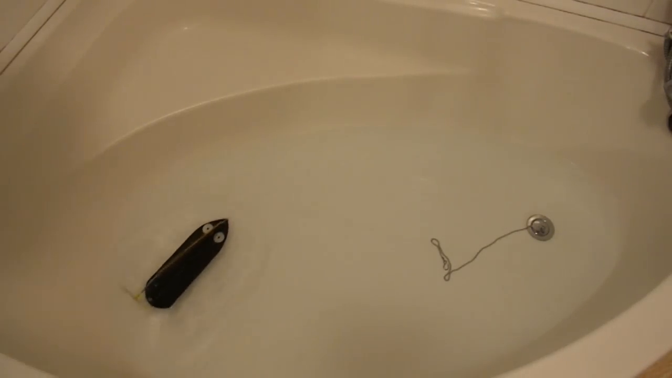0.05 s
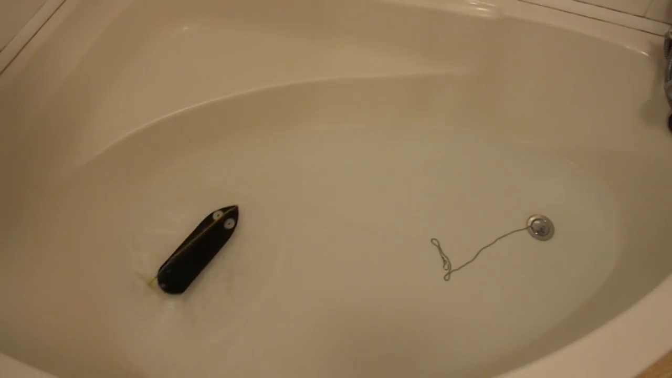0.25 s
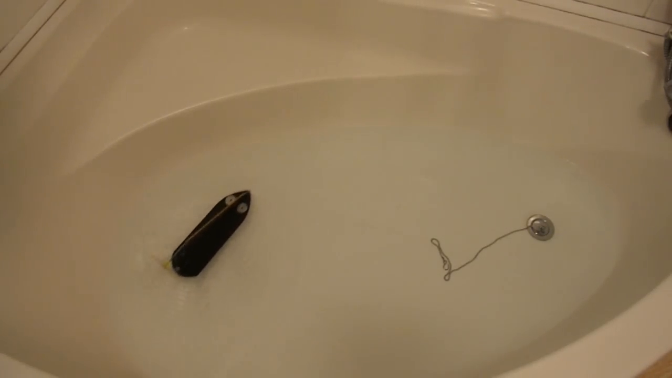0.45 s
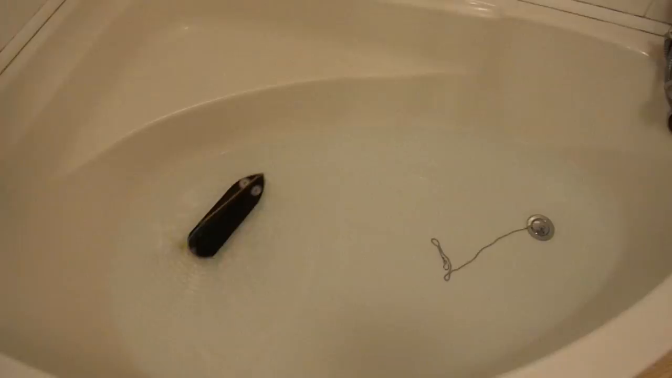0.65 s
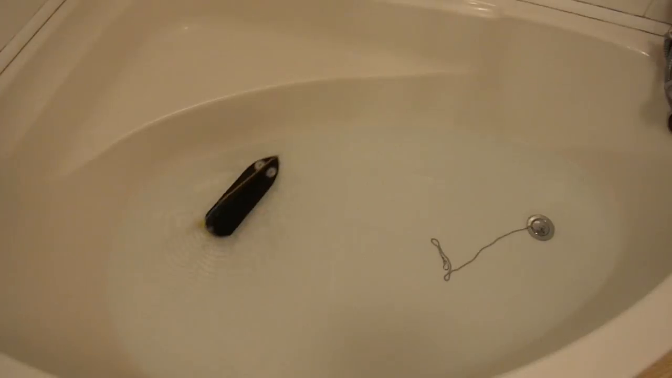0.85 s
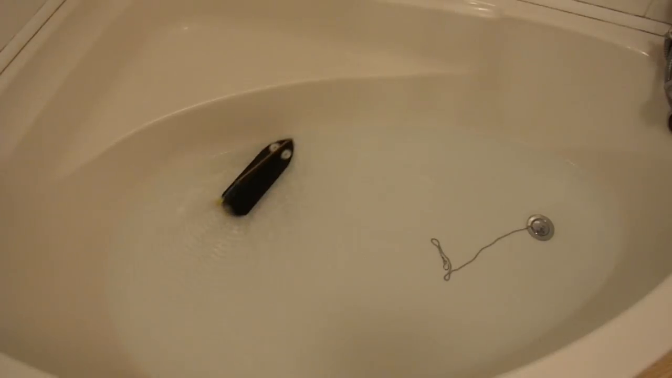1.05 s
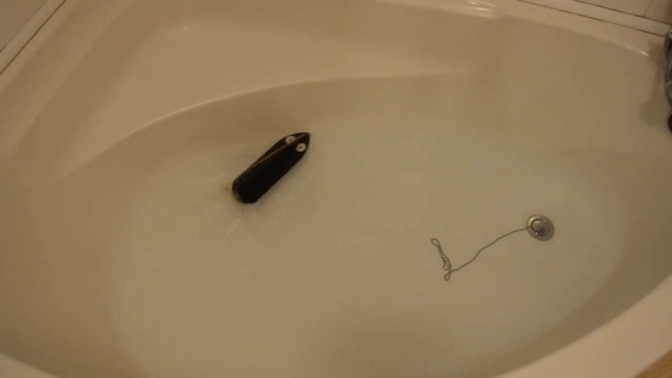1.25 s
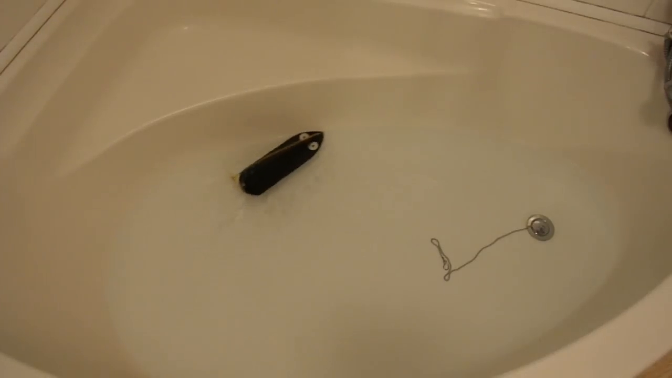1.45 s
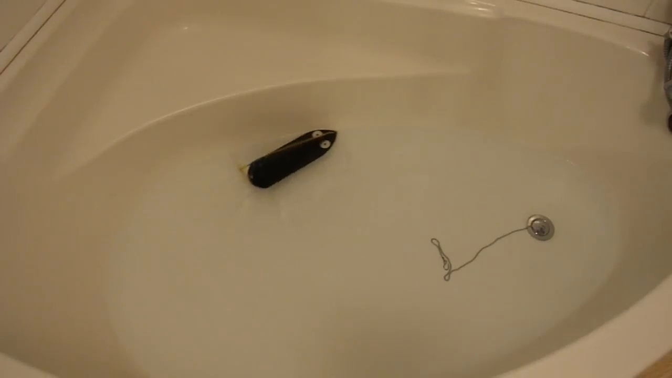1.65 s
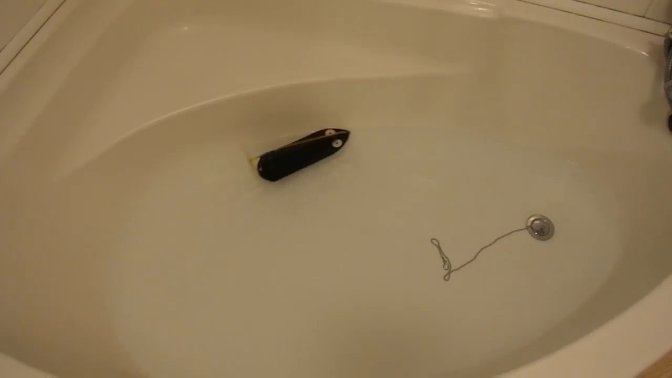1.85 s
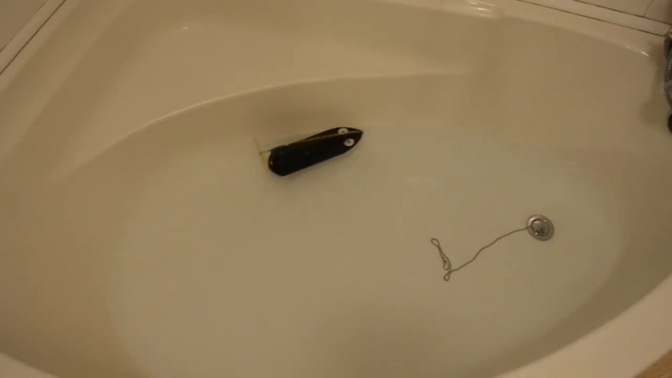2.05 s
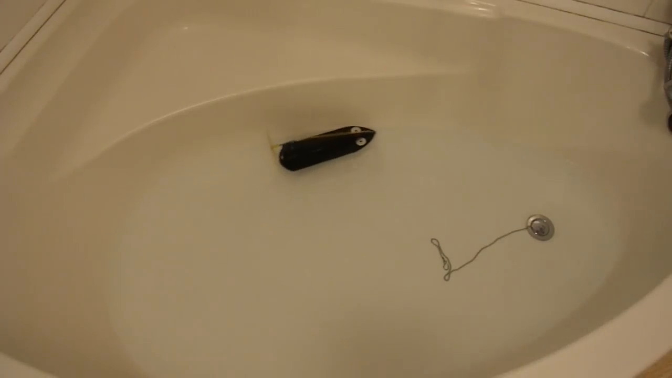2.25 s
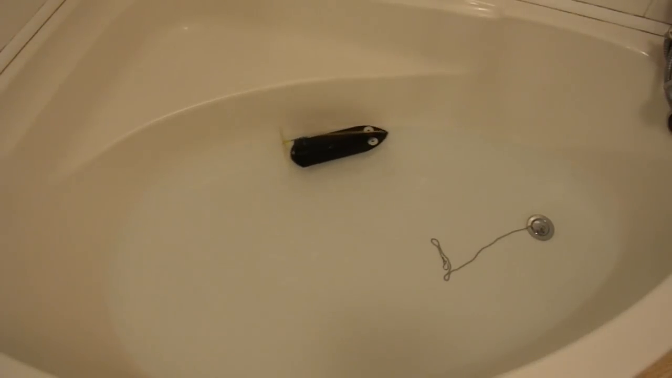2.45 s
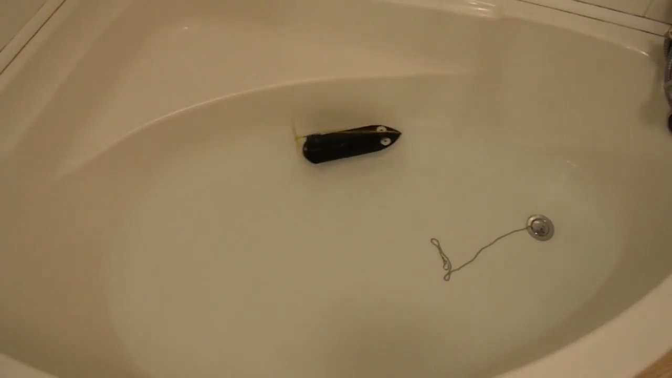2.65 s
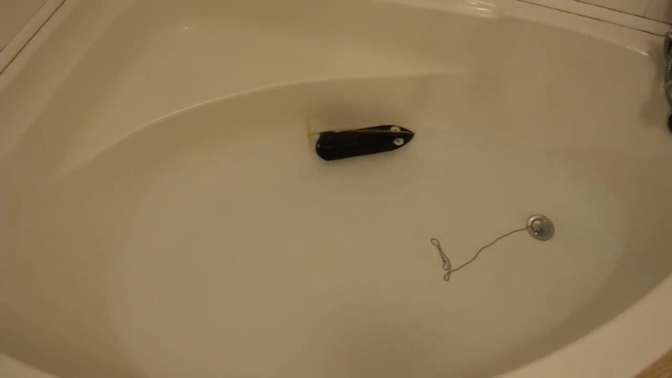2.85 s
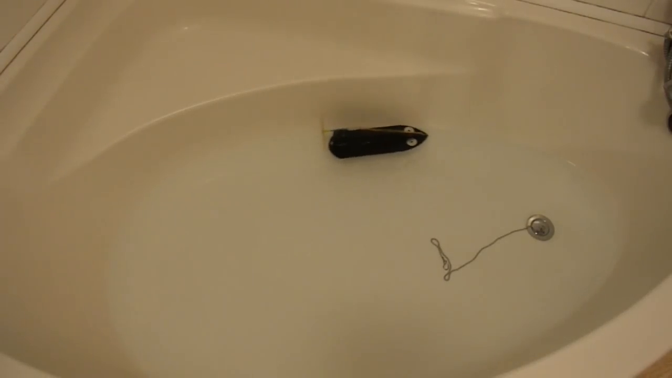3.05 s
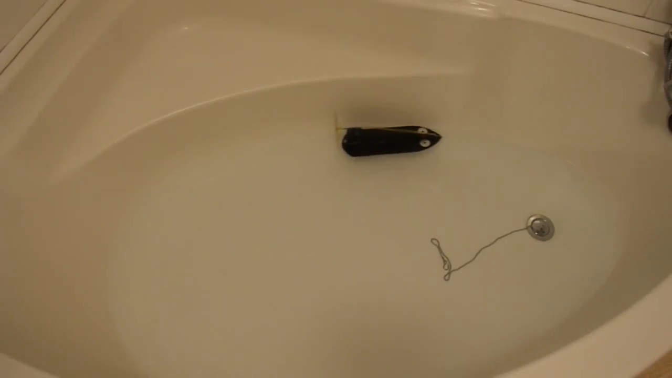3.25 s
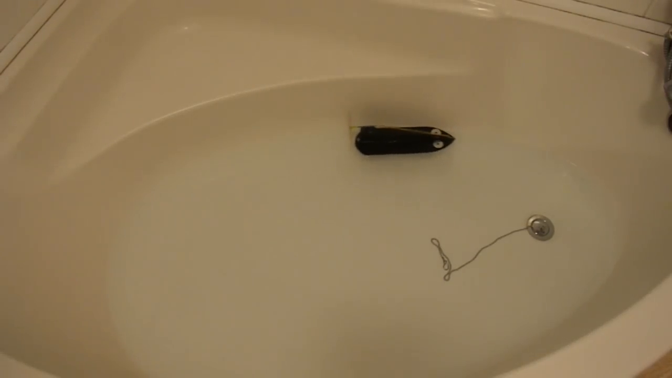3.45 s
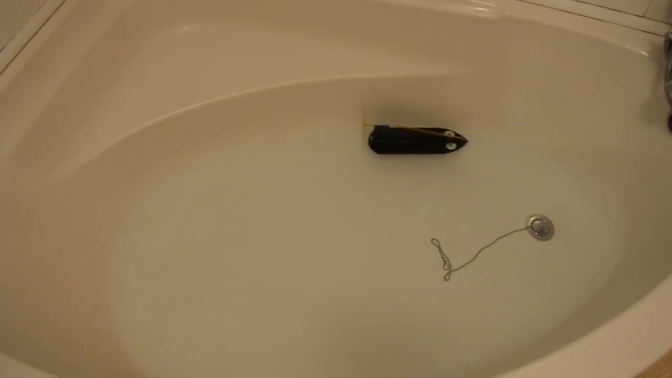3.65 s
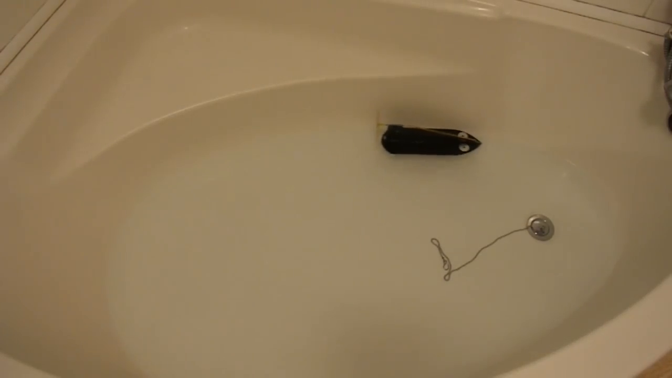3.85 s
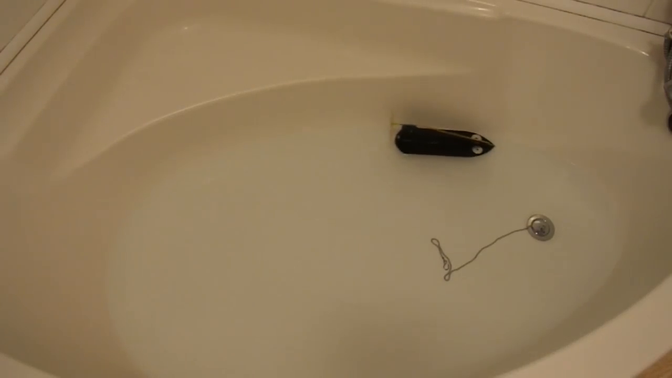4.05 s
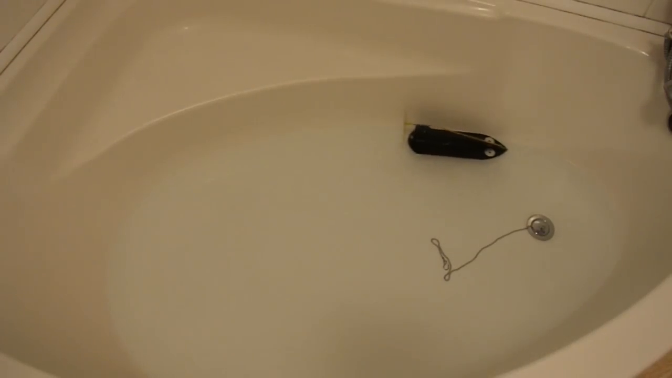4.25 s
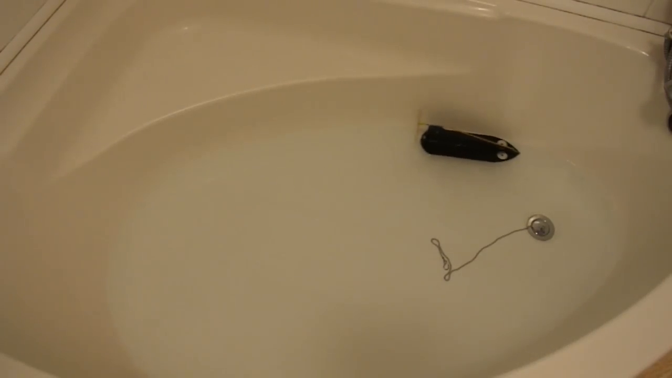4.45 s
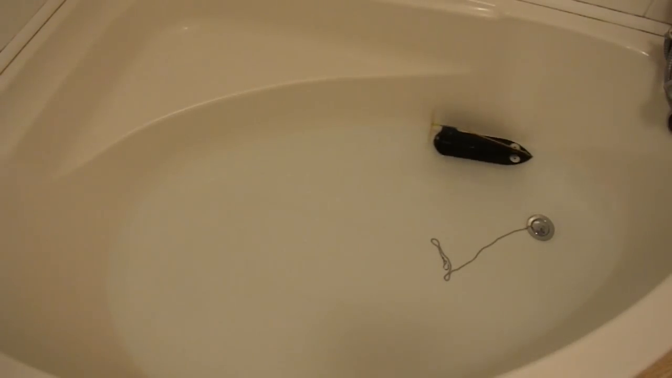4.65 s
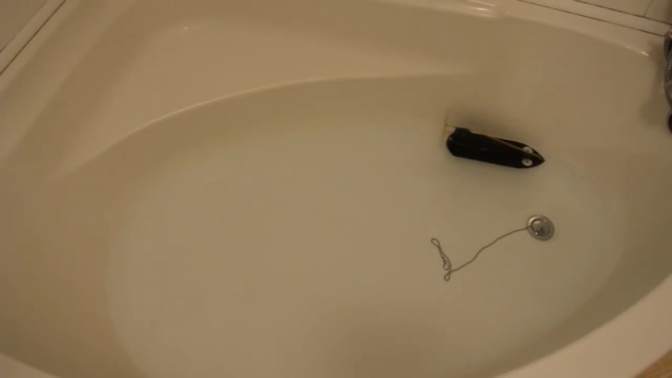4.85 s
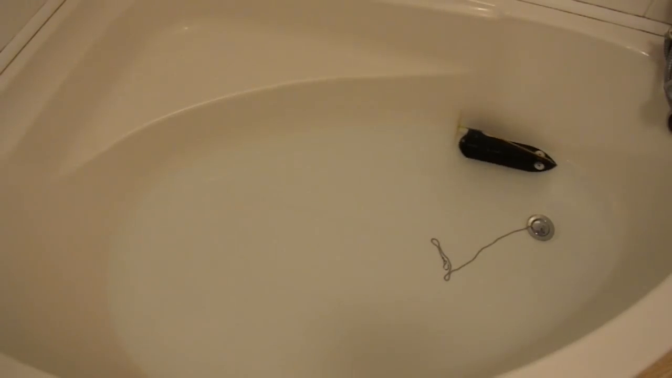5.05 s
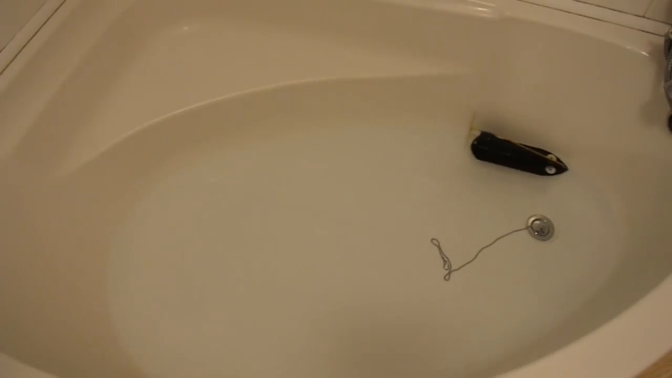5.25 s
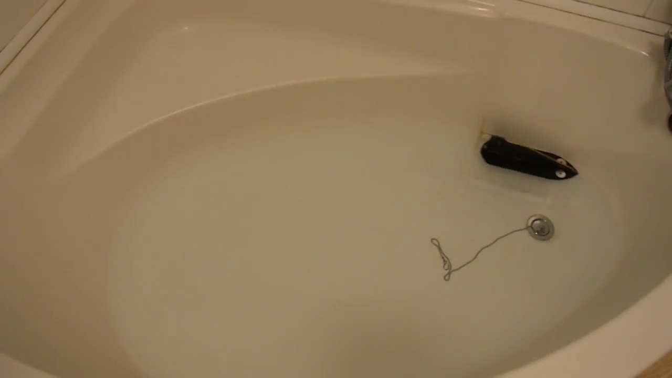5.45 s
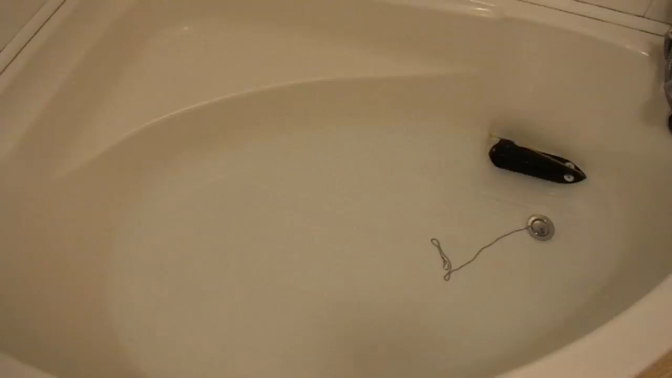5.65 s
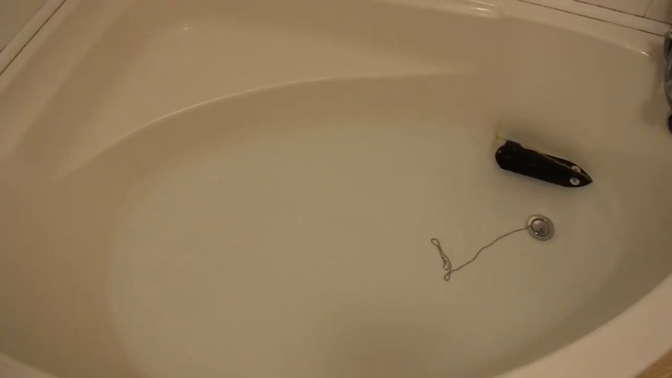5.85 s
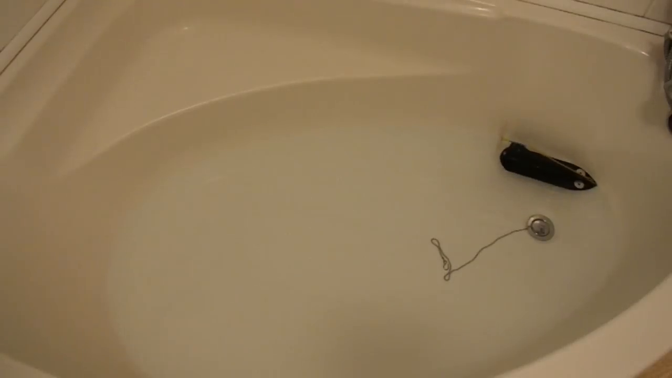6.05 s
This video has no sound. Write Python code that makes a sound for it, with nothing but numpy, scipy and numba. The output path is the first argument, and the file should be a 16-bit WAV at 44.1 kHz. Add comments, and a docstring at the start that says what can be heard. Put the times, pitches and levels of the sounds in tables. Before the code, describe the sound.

Close stereo pickup of a small propeller beating water in a filled bath. Wet, crackling splashes come about thirty times a second, with hollow plastic rapping and bubbling notes. The first second and a half is strongest, then it weakens into sparse patters. A bright hard clack with a short tub echo lands near the end, followed by quiet dribbling.

```python
"""In a hard tiled bathroom a toy boat crosses a filled bath, heard close by two microphone ports side by side.
Its rubber-driven propeller churns ever more weakly: random droplets and noise bursts make spray and splashes.
The churn drums on resonances of tub and hull, bubbles gurgle as rising tones, and the walls echo as noise.
One sharp knock, late on, is a cluster of short rings with flutter and a tub tail; gain control ducks after it.
Low hums, hiss, a thin whine and deep rumble lie beneath."""
import sys
import numpy as np
from scipy import signal
from scipy.fft import rfft, irfft
from scipy.io import wavfile
from scipy.ndimage import uniform_filter1d
from numba import njit

SR = 44100
rng = np.random.default_rng(int(sys.argv[2]) if len(sys.argv) > 2 else 0)


def transcribe(u):
    """Save the signal u as a 16-bit wav file named by the first command-line argument.

    u: samples, shape (n,) or (channels, n), limited to [-1, 1]; the rate is SR.
    q: integer samples, one column per channel.
    """
    v = np.clip(np.atleast_2d(u).T, -1, 1)
    q = np.round(v * 32767).astype(np.int16)
    wavfile.write(sys.argv[1], SR, q)


N = 269010  # length [samples]


def undb(db):
    """Amplitude factor of a level in dB."""
    return 10 ** (np.asarray(db) / 20)


def level(x, db):
    """Scale to an rms level in dB."""
    return x * undb(db) / np.sqrt(np.mean(x ** 2))


def butter(x, order, hz, kind="low"):
    """Butterworth filter with its edge or edges in Hz."""
    return signal.sosfilt(signal.butter(order, hz, kind, fs=SR, output="sos"), x)


def colour(x, table):
    """Causal filter with the given (frequency [Hz], gain [dB]) shape, from the folded cepstrum."""
    hz, db = np.transpose(table)
    size = 8192
    bins_hz = np.arange(1, size // 2 + 2) * SR / size
    log_gain = np.interp(np.log(bins_hz), np.log(hz), db) * np.log(10) / 20
    cepstrum = irfft(log_gain)
    cepstrum[1:size // 2] *= 2
    cepstrum[size // 2 + 1:] = 0
    impulse = irfft(np.exp(rfft(cepstrum)))
    return signal.fftconvolve(x, impulse)[:len(x)]


def band(x, hz, width_hz):
    """One resonance, gain 1 at the centre."""
    return signal.lfilter(*signal.iirpeak(hz, hz / width_hz, fs=SR), x)


def walk(rate):
    """Random levels held 1 / rate s and slewed twice; spread near 1."""
    k = int(SR / rate)
    held = np.repeat(rng.standard_normal(N // k + 1), k)
    return 1.55 * uniform_filter1d(uniform_filter1d(held, k), k)[:N]


def add(out, s, x):
    """Mix x into out from s seconds on."""
    i = round(s * SR)
    out[i:i + len(x)] += x[:len(out) - i]


def hiss():
    """Steady background hiss: coloured noise."""
    # hiss spectrum: (frequency [Hz], density [dB per Hz])
    hiss_shape = [(30, -14), (200, -17), (600, 7), (3000, 5.5), (8000, -12), (15000, -30)]
    return level(colour(rng.standard_normal(N), hiss_shape), -55.5)


def whine(t):
    """A thin steady whine: one sine."""
    whine_hz, rms_db = 9778, -62.5
    return np.sqrt(2) * undb(rms_db) * np.sin(2 * np.pi * whine_hz * t)


def low_hums(t):
    """Narrow wavering notes under the churn: noise through two sharp resonances, faded in and out."""
    # faint hums: (centre time [s], frequency [Hz], level before the fades [dB], half length [s])
    hum_events = [(.7, 178, -69, 0.54), (1.15, 207, -62, .2), (2.2, 148.7, -63.5, 0.76),
                  (3.6, 246.3, -75.5, 1.8)]
    out = 0
    for s, hz, db, half in hum_events:
        note = band(band(rng.standard_normal(N), hz, 9.3), hz, 9.3)
        out = out + level(note, db) * np.exp(-((t - s) / half) ** 4)
    return out


def echo(gap_s=0.0014, rise_s=0.00086):
    """Dense echo of the tiled walls from one spot: octave bands of noise that die at their own pace."""
    # decay time of the room: (frequency [Hz], time to fall 60 dB [s])
    room_decay = [(200, 0.74), (700, 0.26), (2000, 0.73), (6000, 0.011), (14000, 0.6)]
    t = np.arange(SR // 2) / SR
    hz, t60 = np.transpose(room_decay)
    tail = 0
    for f in 180 * 2. ** np.arange(7):
        decay = undb(-60 * t / np.interp(f, hz, t60))
        tail = tail + band(rng.standard_normal(len(t)), f, 0.56 * f) * decay
    tail = tail * np.clip((t - gap_s) / rise_s, 0, 1)
    return tail / np.sqrt(np.sum(tail ** 2))


def room(x, count=16, size=SR // 2):
    """The boat travels, so each stretch of its way has its own echo; the stretches fade into each other."""
    step = N // count
    x = np.pad(x, 2 * step, mode="reflect")  # the propeller was already running
    out = np.zeros(len(x) + SR)
    fade = np.sin(np.pi * np.arange(2 * step) / (2 * step))
    for i in range(0, len(x) - 2 * step, step):
        stretch = x[i:i + 2 * step] * fade
        add(out, i / SR, signal.fftconvolve(stretch, echo()[:size]))
    return out[2 * step:2 * step + N]


def knock():
    """A few quick contacts, each a short swelling ring with grit; the tub wall spreads the blow into the room."""
    # contacts: (time [s], relative level [dB], ring [Hz], build-up [s])
    contacts = [(5.2736, -14, 2400, .0004), (5.2740, -12, 3400, .0003), (5.2736, -13, 950, .0008),
                (5.2749, -8, 6400, .0004), (5.2755, 0, 6500, .0006), (5.2753, -9, 2400, .0009),
                (5.2755, -20, 10500, .0006)]
    # what the tub wall radiates into the room: (frequency [Hz], density [dB per Hz])
    wall_shape = [(71, -76), (120, -20), (250, -30), (498, -11), (575, -10), (676, -14), (900, -5),
                  (1690, -14.5), (2160, -9.5), (4130, -9.5), (7450, -4), (13400, -33), (15500, -70)]
    # ring of the struck tub: (frequency [Hz], relative level [dB], time to fall 60 dB [s])
    tub_body = [(227, -12, 0.47), (303, -10, 0.48), (389, -12.5, .35), (494, 0, 0.32), (528, -4, 0.29),
                (698, 5, 0.27), (857, -7, 0.28), (890, -0.5, 0.26), (928, -4, 0.37), (1070, -14, 0.32),
                (1206, -3, .3), (1950, 0, 0.3), (1980, -13, 0.16), (2500, 0, 0.22)]
    start_s = contacts[0][0]
    out, t = np.zeros(N), np.arange(SR // 100) / SR
    for (s, db, hz, rise), grit in zip(contacts, rng.standard_normal((len(contacts), len(t)))):
        shape = (t / rise) ** 2 * np.exp(1 - (t / rise) ** 2)
        add(out, s, undb(db) * shape * (np.sin(2 * np.pi * hz * t) + 0.2 * grit))
    out = butter(out, 2, [600, 11000], "band")

    # the blow bounces between the tub walls, duller than the blow itself and weaker each time
    bounce_s = 0.0047
    blow = butter(out, 1, 3500)
    for k in range(1, 6):
        out = out + undb(-16 - 1.5 * k) * np.roll(blow, round(k * bounce_s * SR))

    tail = colour(echo(gap_s=0.0025, rise_s=0.002), wall_shape)
    tail = tail * np.exp(-(np.arange(len(tail)) / SR / 0.098) ** 2)  # the wall is damped by the water against it
    add(out, start_s, undb(13.5) * tail / np.sqrt(np.sum(tail ** 2)))

    t = np.arange(SR // 2) / SR
    steps = rng.standard_normal((len(tub_body), len(t)))
    waver = 1.45 * np.cumsum(steps, axis=1) / np.sqrt(SR / 50)  # sloshing water blurs the ring
    body = 0
    for phase, (hz, db, t60) in zip(waver, tub_body):
        body = body + undb(db - 60 * t / t60) * np.sin(2 * np.pi * hz * t + phase)
    add(out, start_s, undb(-29.0) * body * (1 - np.exp(-t / 0.0089)))
    return out


def hull(t):
    """The hull hums on one narrow note while the band is tight, then dies away."""
    hull_hz, width_hz = 342, 48
    hold_s, drop_db, drop_s, fade_db_per_s = 1.14, 8, 0.093, 4.5
    slack = np.maximum(t - hold_s, 0)
    hum_db = -57 - drop_db * np.minimum(slack / drop_s, 1) - fade_db_per_s * slack
    hum = band(band(rng.standard_normal(N), hull_hz, width_hz), hull_hz, width_hz)
    return level(hum, 0) * undb(hum_db)


def strokes(per_s, uneven, fall_s):
    """Each blade stroke throws a quick burst that dies away; spacing and strength vary."""
    span = N + SR  # the strokes began a second earlier
    gap, size = rng.standard_normal((int(2 * per_s * span / SR), 2)).T
    at = (np.cumsum(np.exp(uneven * gap)) * SR / per_s).astype(int)
    kicks = np.bincount(at[at < span], undb(1.6 * size[at < span]), span)
    t = np.arange(SR // 10) / SR
    bursts = signal.fftconvolve(kicks, t * np.exp(-t / fall_s))[:span]
    return (bursts / uniform_filter1d(bursts, size=SR // 8))[SR:]  # the mean effort stays with the rubber band


def rings():
    """Stroke after stroke keeps a wavering resonance going while it swells and fades again."""
    # one resonance of hull or tub rings up under the strokes:
    # (centre time [s], frequency [Hz], level before the swell [dB], half length [s])
    ring_events = [(0.22, 2180, -50, 0.14), (0.564, 1890, -41, 0.12), (0.62, 2570, -44, 0.1),
                   (0.664, 730, -43.5, 0.083), (.89, 770, -43, .015), (.94, 600, -42, .012),
                   (.97, 600, -43, .012), (1.005, 720, -40, .015), (1.06, 760, -40, 0.035),
                   (1.115, 780, -42, .012), (1.178, 690, -41, .012), (1.094, 1904, -38, 0.034),
                   (1.18, 1876, -41, 0.022), (1.117, 2650, -44, 0.14), (1.215, 834, -43, 0.03),
                   (1.408, 2660, -50, 0.09), (1.427, 1930, -47, 0.12), (1.754, 2716, -44.5, 0.22),
                   (1.844, 828, -48, 0.2), (1.924, 830, -45, 0.047), (2.526, 609, -41.5, 0.028),
                   (2.532, 2060, -44, 0.029), (2.637, 827, -41.5, 0.034), (2.638, 2800, -52, 0.034),
                   (3.0, 1950, -49, 0.042), (3.281, 798, -47, 0.027), (3.335, 2050, -42, 0.021),
                   (3.434, 1995, -42, 0.019), (4.469, 1915, -55, 0.12), (5.475, 1015, -53, 0.02),
                   (5.62, 2660, -52, 0.016), (5.695, 3510, -47, .02)]
    width_hz = 46
    out = np.zeros(N)
    raps = 0.34 + 0.72 * strokes(36, uneven=0.2015, fall_s=0.0056)
    for (s, hz, db, half), chance in zip(ring_events, rng.standard_normal((len(ring_events), 2 * SR))):
        i = max(int((s - 2 * half) * SR), 0)
        t = np.arange(i, int((s + 2 * half) * SR)) / SR
        waver = np.cumsum(chance[:len(t)]) * np.sqrt(2 * np.pi * width_hz / SR)
        rapped = np.sin(2 * np.pi * hz * t + waver) * raps[i:i + len(t)]
        tone = band(rapped, hz, 2 * width_hz)
        add(out, i / SR, level(tone, db) * np.exp(-((t - s) / half) ** 2))
    return out


def bubbles(per_s, low_hz, high_hz, cycles):
    """Air pulled under rings briefly, rising in pitch."""
    out, t = np.zeros(N), np.arange(SR // 50) / SR
    for when, pitch, size in rng.random((int(per_s * N / SR), 3)):
        hz = low_hz * (high_hz / low_hz) ** pitch
        turns = hz * t * (1 + 0.1335 * hz * t / cycles)
        pulse = np.sin(2 * np.pi * turns) * np.exp(-hz * t / cycles)
        add(out, when * N / SR, undb(-12 * size) * pulse)
    return level(out, 0)


def droplets(per_s, spread_db, most_db=14):
    """Tiny impacts at random moments, a few much larger than the rest."""
    hit, size, sign = rng.random((3, N))
    size_db = np.minimum(-spread_db * np.log(1 - size), most_db)
    return level((hit < per_s / SR) * undb(size_db) * np.sign(sign - .5), 0)


def drum(modes):
    """Churned water thumps on a set of tub resonances, each swelling at its own moments."""
    churn = droplets(1500, 3.1) * undb(1.5 * walk(30.11))
    out = 0
    for hz, width, db in modes:
        swell = undb(db + 1.8 * walk(7.62))
        out = out + swell * band(churn, hz, width) / np.sqrt(width)
    return level(out, 0)


def splashes(spray_size):
    """Splashes that stand out: noise bursts weighted to one pitch, and the soft thump each gives the tub."""
    # splashes: (time [s], level before the spray colour [dB], centre [Hz])
    splash_events = [(0.0905, -20, 5000), (0.1434, -21.5, 3300), (0.262, -24.5, 2160),
                     (0.3034, -22.5, 4320), (0.338, -20.5, 6330), (0.415, -35, 3500), (0.4669, -26, 3800),
                     (0.5001, -23, 1880), (0.601, -33, 2030), (0.6324, -22.5, 2600), (0.7885, -25, 7450),
                     (.9193, -25.5, 4000), (0.957, -23.5, 4200), (1.0, -20, 3280), (1.049, -29, 3500),
                     (1.079, -24, 1900), (1.11, -24.5, 2680), (1.1687, -30, 1910), (1.19, -23.5, 2720),
                     (1.25, -36, 4000), (1.2793, -27, 4300), (1.307, -25.5, 2980), (1.3525, -26, 2900),
                     (1.3887, -30, 3340), (1.4212, -25, 4070), (1.483, -37, 7540), (1.514, -22.5, 1980),
                     (1.609, -27, 2700), (1.6344, -28, 2940), (1.7484, -35, 2680), (1.8431, -26.5, 2390),
                     (1.8846, -30, 3960), (1.912, -35, 4000), (1.944, -27.5, 2200), (1.9794, -30, 4000),
                     (2.011, -32, 4000), (2.098, -42, 4000), (2.1767, -28.5, 3160), (2.364, -44, 4000),
                     (2.4126, -33, 2800), (2.4834, -42, 4000), (2.519, -29, 2300), (2.5726, -30, 4000),
                     (2.6166, -23, 2800), (2.698, -28, 4000), (2.7635, -27, 3430), (2.8594, -29, 3480),
                     (2.9193, -35, 4000), (2.978, -28.5, 2400), (3.022, -32, 3500), (3.0629, -34, 4000),
                     (3.105, -36, 6000), (3.166, -29, 2240), (3.214, -46, 4000), (3.2465, -34, 4060),
                     (3.3321, -23, 2010), (3.4044, -27.5, 4000), (3.441, -36, 2070), (3.4825, -30.5, 3980),
                     (3.5403, -34, 4000), (3.61, -41, 3980), (3.7973, -30.5, 5530), (3.818, -28, 2820),
                     (3.858, -28.5, 2960), (3.913, -27.5, 2580), (3.9928, -48, 7500), (4.022, -29.5, 3300),
                     (4.0632, -30, 5800), (4.1204, -30.5, 6800), (4.1545, -29, 3450), (4.2223, -32, 5000),
                     (4.2809, -28.5, 2900), (4.3603, -32, 3500), (4.428, -31, 6490), (4.571, -43, 4000),
                     (4.6867, -37, 4000), (4.7696, -32.5, 4000), (4.8635, -32, 6500), (4.9053, -33, 4000),
                     (4.9791, -35, 3770), (5.0455, -28.5, 6900), (5.1243, -29, 2730), (5.4464, -34, 4330),
                     (5.6097, -31, 2690), (5.6796, -36, 3290), (5.75, -34, 6890), (5.7798, -35, 4000),
                     (5.8093, -36, 4490), (5.957, -31.5, 3300), (6.019, -39, 4000), (6.0492, -42, 4000),
                     (6.0824, -32, 7700)]
    t, slaps, thumps = np.arange(SR // 20) / SR, np.zeros(N), np.zeros(N)
    shape = (1 - np.exp(-t / 0.003)) * (np.exp(-t / 0.0023) + 0.53 * np.exp(-t / 0.013))
    for (s, db, hz), burst in zip(splash_events, rng.standard_normal((len(splash_events), len(t)))):
        slap = burst + undb(2) * band(burst, hz, 830)
        # noise peaks stand well above the mean, hence the last divisor
        add(slaps, s, undb(db) * slap * shape / shape.max() / np.std(slap) / 2.24)
        add(thumps, s, undb(db) * t / 0.0098 * np.exp(1 - t / 0.0073))
    return slaps, thumps / spray_size


def propeller(spray_db, low_db, ring_db):
    """Spray flutters with the uneven blade strokes; the churn drums in the tub and raps the shell."""
    # spray spectrum: (frequency [Hz], density [dB per Hz])
    spray_shape = [(88, -78), (150, -15), (220, -15.5), (270, -22), (346, -20), (453, -30), (583, -12),
                   (812, -1), (966, -3.5), (1570, -6), (1910, -8.5), (2060, -5.5), (7410, -0.5),
                   (15500, -27)]
    # tub resonances: (frequency [Hz], width [Hz], relative level [dB])
    tub_modes = [(505, 35, -16), (593, 35, 0), (636, 35, 0), (677, 41, 5), (763.6, 35, 3.5), (827, 31, 2.5),
                 (970, 47, -7.5), (1046, 72, -2), (1684, 50, -5), (2178, 48, 2), (2320, 66, -7),
                 (2587, 97, 3.5), (2714, 88, -8)]
    split_hz = 1500  # low drumming below, upper ring above

    spray = droplets(3200, 3.0, most_db=18.5) * undb(spray_db)
    spray = spray * (0.83 + 0.16 * strokes(28, uneven=0.16, fall_s=0.0038))
    slaps, thumps = splashes(undb(spray_db))
    spray = spray + slaps
    # the finest mist comes in its own quick puffs
    mist = spray - butter(spray, 1, 7000)
    spray = spray + mist * (undb(2.43 * walk(20)) - 1)
    spray = colour(spray, spray_shape) / np.std(colour(rng.standard_normal(N), spray_shape))

    # the tub booms stroke by stroke
    beat = .55 + .35 * strokes(31, uneven=0.119, fall_s=0.0062) + 0.095 * thumps
    low = undb(low_db) * beat * drum([m for m in tub_modes if m[0] < split_hz])
    low = butter(low, 4, 533, "high")  # the filled tub radiates no deep bass
    ring = undb(ring_db - 14.5) * drum([m for m in tub_modes if m[0] > split_hz])
    gurgle = undb(ring_db - 11.5) * bubbles(180, 1262, 4160, cycles=5.17)

    # each stroke raps the shell
    taps = droplets(1200, 2.8) * (0.44 + 0.53 * strokes(36, uneven=.15, fall_s=0.005))
    shell = level(band(taps, 1903, 70), 0) * undb(spray_db - 14)
    return spray + low + ring + gurgle + shell


def ports(near):
    """Two close ports share the direct sound; a little arrives from other walls and differs between them."""
    treble = butter(near, 2, 4000, "high")
    apart = room(undb(-8.0) * treble + undb(-12.0) * band(near, 810, 270), count=20, size=SR // 200)
    left = np.r_[0, near[:-1]]  # the left port lies a few millimetres further off
    return np.array([left + apart, near - apart])


def scene():
    """The boat direct and off the walls, its rings and hum, the knock and the background, at the two ports."""
    # propeller effort as the rubber unwinds:
    # (time [s], spray level [dB], low drumming of the tub [dB], its upper ring before a fixed cut [dB])
    churn_course = [(0, -32.5, -42, -47), (.16, -32, -38.5, -37), (.24, -37.5, -40, -26.5),
                    (.34, -33, -40.5, -57), (.56, -34, -37, -46), (.66, -34, -43, -33),
                    (0.801, -33, -43, -40), (0.889, -36, -36, -32), (.98, -31.5, -36.5, -32),
                    (1.08, -31, -37.5, -42), (1.191, -34, -42, -33), (1.27, -37.5, -44.5, -40),
                    (1.36, -35, -38, -37), (1.72, -38.5, -42.5, -35), (1.9, -37, -40, -36.5),
                    (2.35, -38, -44, -37.5), (2.62, -38.5, -43, -40.5), (2.9, -42, -44, -37),
                    (3.02, -39.5, -44.5, -35.5), (3.36, -40, -46, -35.5), (3.7, -40.5, -48.5, -41),
                    (3.98, -43, -52, -39), (4.399, -41, -52, -40), (5.1, -41.5, -55.5, -43.5),
                    (5.25, -45, -56, -41), (5.52, -48, -59, -45), (5.64, -47, -52, -44),
                    (5.88, -43.5, -52, -46), (5.96, -49.5, -58, -70), (6.1, -43, -53, -47)]
    t = np.arange(N) / SR
    s, *columns = np.transpose(churn_course)
    spray_db, low_db, ring_db = (np.interp(t, s, c) for c in columns)
    spray_db = spray_db + 0.21 * walk(14)  # the water's load on the blades wavers from stroke to stroke
    boat = propeller(spray_db, low_db, ring_db)
    near = undb(-1.5) * boat + undb(-5.5) * room(boat)
    near = near + rings() + hull(t) + knock()
    near = near + hiss() + low_hums(t) + whine(t)
    return ports(near)


@njit
def follow(x, attack, release):
    """Peak follower: quick up, slow down."""
    e, out = 0., np.empty(len(x))
    for i in range(len(x)):
        e += (x[i] - e) * (attack if x[i] > e else release)
        out[i] = e
    return out


def record(dry):
    """Gain control ducks after loud peaks; then a narrow notch, bass cut, narrowed stereo and top cut."""
    attack_s, release_s, threshold_db = 0.0028, 0.3, -9.0
    loud = follow(np.abs(dry).max(axis=0), 1 / (attack_s * SR), 1 / (release_s * SR))
    x = dry * np.minimum(1, undb(threshold_db) / (loud + 1e-9)) ** .5
    x = np.tanh(x / 1.3) * 1.3  # the input stage rounds the very top
    x = signal.lfilter(*signal.iirnotch(6990, 120, fs=SR), x)
    x = butter(x, 3, 260, "high")

    # the ports differ mostly in the treble
    mid, side = (x[0] + x[1]) / 2, (x[0] - x[1]) / 2
    side_high = signal.sosfiltfilt(signal.butter(2, 1940, "high", fs=SR, output="sos"), side)
    side = 0.17 * side + 0.88 * side_high

    # the electronics flutter faintly in the deep bass
    rumble = butter(rng.standard_normal(N), 2, [35, 139], "band")
    mid = mid + level(rumble * undb(3.7 * walk(14)), -84.5)
    top_cut = signal.ellip(8, .2, 70, 15700, fs=SR, output="sos")
    return signal.sosfilt(top_cut, [mid + side, mid - side])


dry = scene()
out = record(dry)
transcribe(out)
```